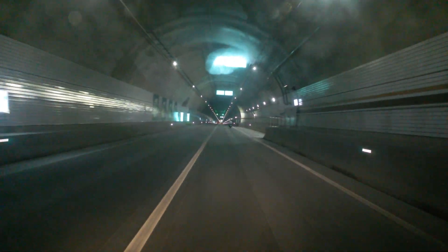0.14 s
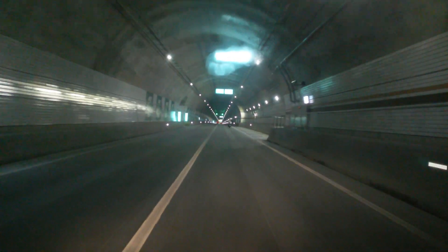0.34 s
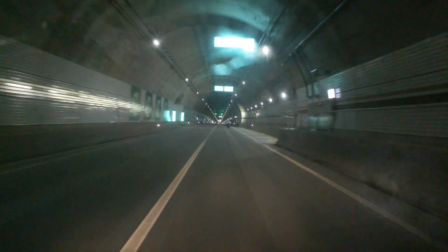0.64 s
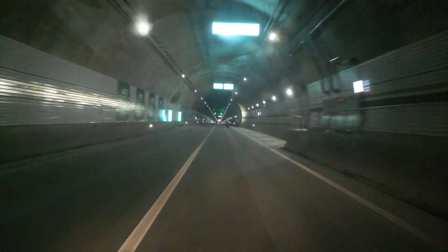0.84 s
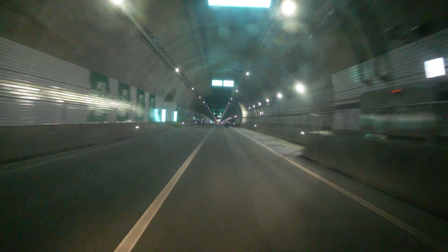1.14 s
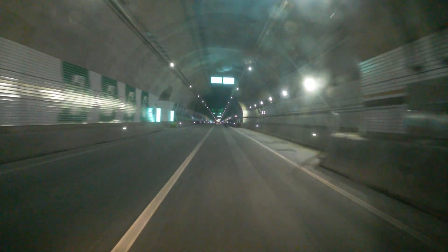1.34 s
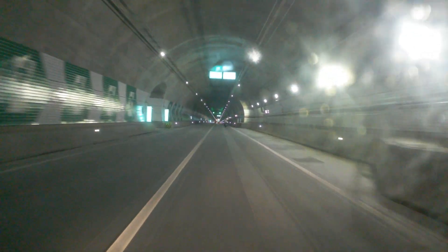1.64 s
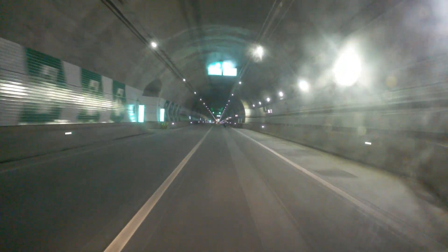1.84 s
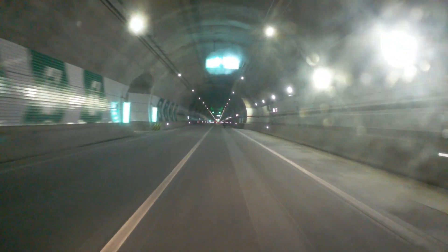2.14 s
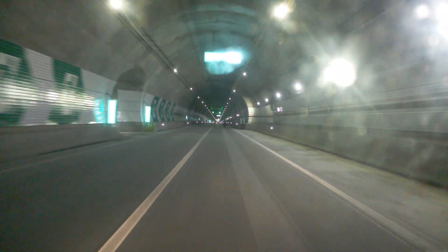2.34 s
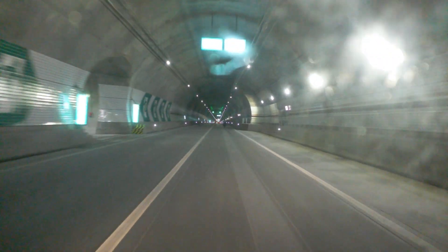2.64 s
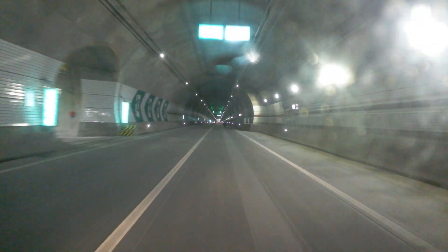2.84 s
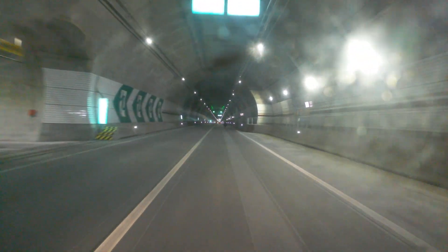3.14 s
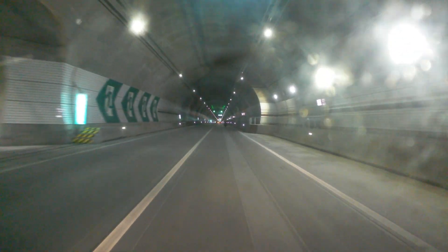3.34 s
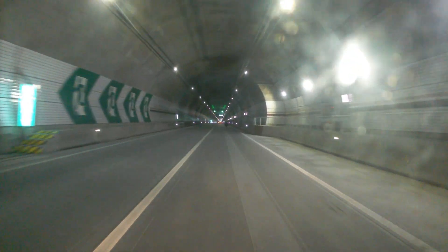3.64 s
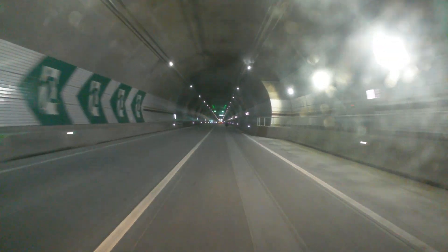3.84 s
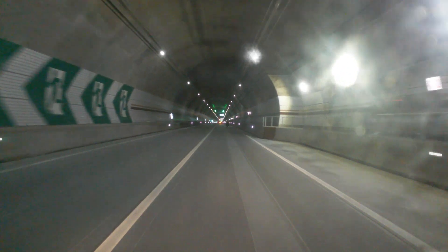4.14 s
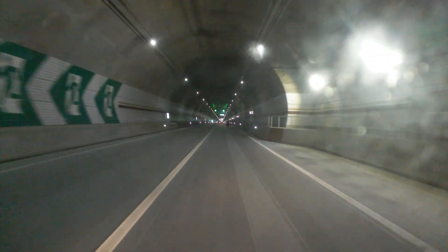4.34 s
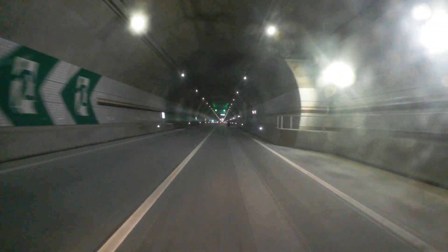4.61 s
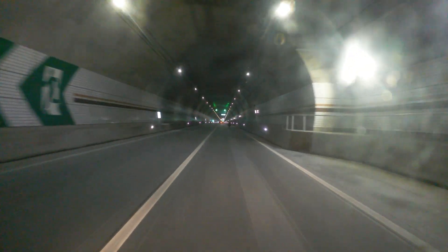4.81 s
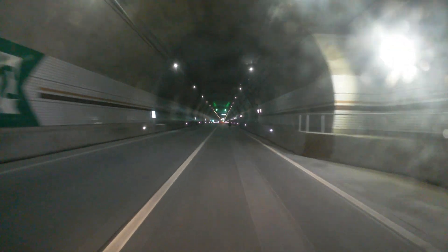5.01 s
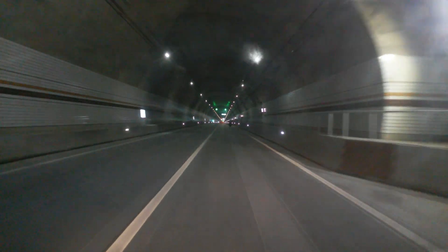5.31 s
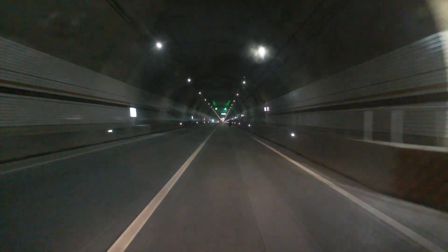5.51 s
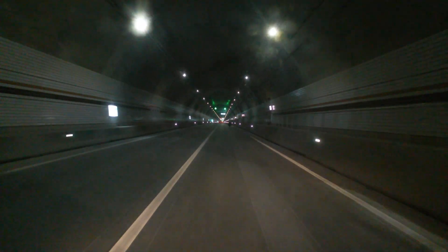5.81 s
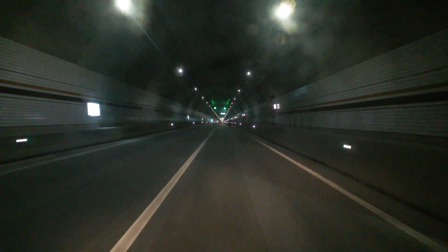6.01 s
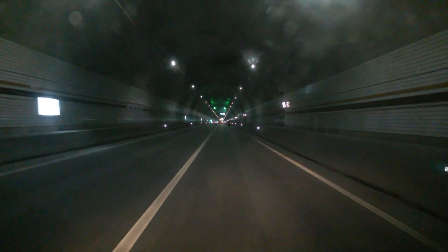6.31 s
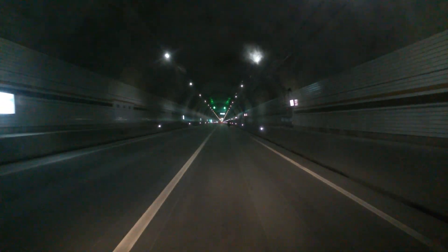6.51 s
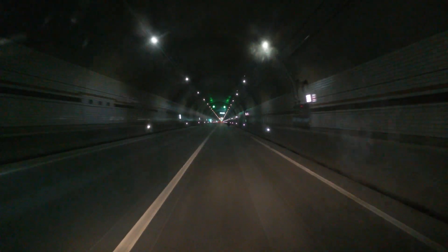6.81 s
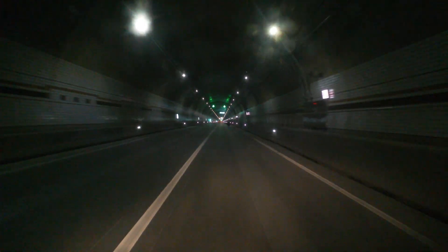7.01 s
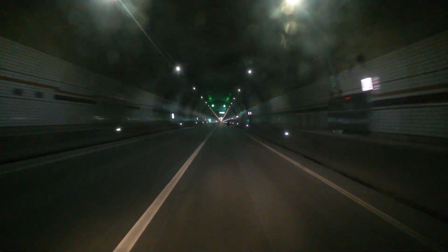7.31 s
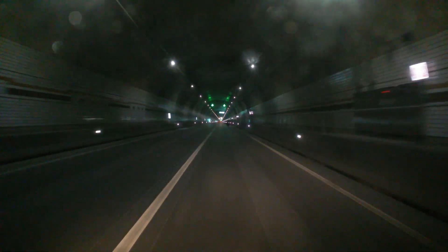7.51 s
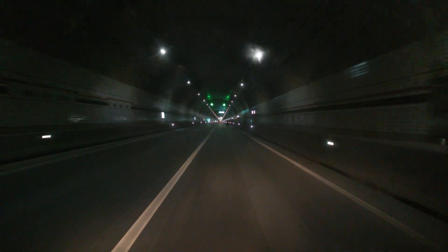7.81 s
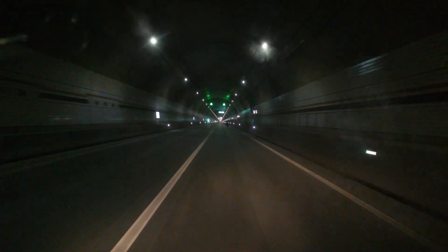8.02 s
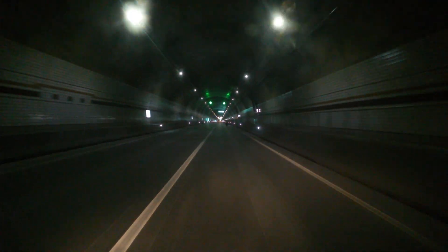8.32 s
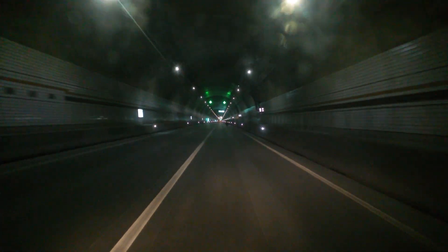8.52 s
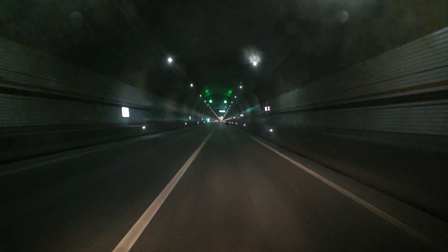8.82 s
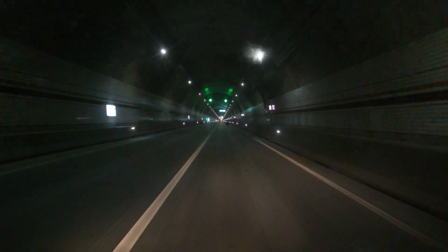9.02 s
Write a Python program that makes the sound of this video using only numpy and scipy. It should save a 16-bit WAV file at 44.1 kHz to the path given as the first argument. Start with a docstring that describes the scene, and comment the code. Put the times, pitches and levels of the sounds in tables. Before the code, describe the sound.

Steady low rumble and engine drone fill the cabin of a car driving through a tunnel, picked up by two dashboard microphones. Uneven spots give soft low thuds under a light hiss of air. After a few seconds the tyre tread drones louder and sings in brief pulses. Around the middle and again near the end, rougher road adds a booming roar and a gentle whoosh off the wall.

```python
"""Driving through a road tunnel

Inside a cruising car, heard by two microphones on the dashboard. The engine hums, the tyre tread
drones and sings in short surges, a faint whine fades, and air hisses at the glass with soft ticks.
The road rumbles through the car's body: coarser stretches swell the roar and uneven spots thud.
Now and then the wall throws tyre noise back as a whoosh."""
import sys
import numpy as np
from scipy import signal
from scipy.io import wavfile
from scipy.ndimage import uniform_filter1d

SR = 44100
rng = np.random.default_rng(int(sys.argv[2]) if len(sys.argv) > 2 else 0)


def to_wav(sig):
    """Store sig (one row per channel, or 1-D mono) as 16-bit WAV at the path in sys.argv[1].

    Samples outside -1..1 are clipped; the rate is SR.
    """
    pcm = np.clip(np.atleast_2d(sig), -1, 1) * 32767
    pcm = np.round(pcm).astype(np.int16)
    wavfile.write(sys.argv[1], SR, pcm.T)  # frames by channels


N = 403515
TIME_S = np.arange(N) / SR
MIDWAY_S = 4.0  # slow changes in loudness are counted from this moment


def gain_of(db):
    """Turn decibels into a number to multiply by."""
    return 10 ** (np.asarray(db) / 20)


def unit_level(x):
    """Scale a signal so that its average power is 1."""
    return x / np.sqrt(np.mean(x ** 2) + 1e-20)


def curve_at(points, hz):
    """Join a table's points into a curve and look it up at these pitches."""
    pitch_hz, value = np.transpose(points)
    return np.interp(np.log(hz + 1), np.log(pitch_hz + 1), value)


def drift(t, top_hz):
    """A random wander: sine waves with random starts, the slow ones stronger."""
    rates_hz = top_hz * np.geomspace(.05, 1, 16)
    return unit_level(sum(np.sin(2 * np.pi * (hz * t + rng.random())) / np.sqrt(hz) for hz in rates_hz))


def tone(turns, level_db, left_louder_db, left_ahead_rad):
    """A pure tone at both microphones; turns counts its vibrations so far."""
    side = np.array([[.5], [-.5]])
    gain = np.sqrt(2) * gain_of(level_db + left_louder_db * side)
    return gain * np.cos(2 * np.pi * turns + left_ahead_rad * side)


# How fast the four-stroke engine runs: time_s, cycles_per_s
ENGINE_SPEED = [(0, 16.55), (.7, 16.52), (3.9, 16.8), (5.9, 16.91), (9.15, 17.08)]
def engine_cycles():
    """Count the engine cycles completed since the start."""
    return np.cumsum(np.interp(TIME_S, *np.transpose(ENGINE_SPEED))) / SR


# The hum's tones: cycle_multiple, midway_level_db, midway_growth_db_per_s, left_louder_db, left_ahead_rad
HUM_TONES = [(2, -42, 0, 1.7, -0.16), (3, -49, 1.7, 2.2, -0.25), (4, -33, 2.0, 1.8, 0.1),
             (6, -45, 1.4, 1.5, -0.03), (7, -46, 1.1, 1.0, -0.26), (8, -26, -.1, -0.5, -0.05),
             (9, -38, .4, 1.6, -0.09), (10, -36, -.4, -0.9, -0.25), (11, -45, 2.0, 0.6, -0.4),
             (12, -29, 1.4, -0.6, -0.15), (13, -29.5, 1.0, -0.2, 0.12), (14, -25.7, -1.1, -1.6, -0.02),
             (15, -33, .1, 1.3, 0.15), (16, -50, -2.0, -1.9, -0.09), (17, -42, -.3, 1.7, -0.15),
             (19, -48, -1.5, -0.8, 0.15), (20, -47, 2.0, 1.5, -0.06), (25, -41, 3.3, -3.0, -1.0),
             (26, -48, 1.4, 0.7, 0.14), (28, -37.2, -.1, 2.6, -0.13), (32, -45, .6, 6.2, 0.92),
             (34.4, -47, .6, 2.0, 0.3), (36, -44, -.3, 1.0, -0.82), (40, -53, 0, 1.4, 0.85),
             (41, -55, 1.5, 1.2, 0.9), (56, -64, -1.3, 2.4, 2.92), (72, -59.5, -1.4, 1.8, -2.77),
             (96, -61, -1.3, 0, 1.0), (108, -67, -1.0, 0, 0), (144, -65, -.4, 1.0, 1.0)]
# Brief dips and swells of single tones: cycle_multiple, middle_s, half_length_s, change_db
HUM_DIPS_AND_SWELLS = [(14, 2.9, .65, -4), (15, .2, 0.44, -6), (15, 2.9, 1.0, -4), (28, 3.2, 0.79, -8),
                       (28, 5.2, 0.15, -3), (28, 6.7, .25, -6), (13, 1.9, 0.56, -4), (12, 1.6, 0.5, 4),
                       (12, 3.4, .12, 2), (12, 2.5, .3, 2), (12, 6.3, 0.078, 5), (12, 4.9, 0.058, 6),
                       (12, 7.7, 0.16, 5), (13, 8.74, 0.28, 1.5)]
def engine():
    """The engine hums at multiples of its cycle rate; each tone wavers a little with the load."""
    step = 8  # the hum is low, so every eighth sample is enough
    level_off_s, waver_db, slip_turns = 2.5, 1.0, .03
    cycles, t = engine_cycles()[::step], TIME_S[::step]
    grid_s = np.arange(0, N / SR + .1, .02)
    growing_s = level_off_s * np.tanh((grid_s - MIDWAY_S) / level_off_s)
    hum = np.zeros((2, len(t)))
    for multiple, midway_db, growth, left_louder_db, left_ahead_rad in HUM_TONES:
        level_db = midway_db + growth * growing_s + waver_db * drift(grid_s, top_hz=12)
        for which, middle_s, half_s, change_db in HUM_DIPS_AND_SWELLS:
            if which == multiple:
                level_db += change_db * np.exp(-((grid_s - middle_s) / half_s) ** 2)
        smear = .09 * multiple ** 2  # the body spreads each firing over the cycle
        slip = np.interp(t, grid_s, slip_turns * drift(grid_s, top_hz=3))
        turns = multiple * cycles + smear + slip
        hum += tone(turns, np.interp(t, grid_s, level_db), left_louder_db, left_ahead_rad)
    return signal.resample_poly(hum, step, 1, axis=1)[:, :N]


# How loud the tread drones: time_s, level_db
TREAD_LOUDNESS = [(0, -38), (2.3, -41.5), (2.6, -33), (3.2, -30), (3.8, -31.5), (4.2, -50), (4.45, -30.5),
                  (5.2, -33), (6.1, -38), (6.35, -30.5), (7.05, -31), (7.22, -38), (7.45, -27.5),
                  (7.95, -25), (8.3, -27.5), (8.7, -26.5), (9.15, -28)]
def tread_drone():
    """Tread blocks meet the road at a rate geared to the engine; pitch and loudness tremble."""
    blocks_per_cycle, tremble_hz, tremble_db = 24.36, 1.5, 2.2
    grid_s = np.arange(0, N / SR + .1, .01)
    pitch_shift_hz = np.interp(TIME_S, grid_s, tremble_hz * drift(grid_s, top_hz=12))
    turns = blocks_per_cycle * engine_cycles() + np.cumsum(pitch_shift_hz) / SR
    level_db = np.interp(TIME_S, *np.transpose(TREAD_LOUDNESS))
    level_db += np.interp(TIME_S, grid_s, tremble_db * drift(grid_s, top_hz=12))
    return tone(turns, level_db, left_louder_db=-4, left_ahead_rad=-1.4)


# The course of the whine: time_s, pitch_hz, level_db
WHINE_COURSE = [(0, 1191, -52), (2, 1191, -52), (3.7, 1188, -56), (5, 1180, -62), (9.15, 1172, -58)]
def whine(waver_hz=6.0):
    """A thin, fading tone with an unsteady pitch."""
    time_s, pitch_hz, level_db = np.transpose(WHINE_COURSE)
    grid_s = np.arange(0, N / SR + .1, .01)
    pitch_shift_hz = np.interp(TIME_S, grid_s, waver_hz * drift(grid_s, top_hz=15))
    turns = np.cumsum(np.interp(TIME_S, time_s, pitch_hz) + pitch_shift_hz) / SR
    return tone(turns, np.interp(TIME_S, time_s, level_db), left_louder_db=0, left_ahead_rad=.5)


# How alike noise is at the two microphones: pitch_hz, likeness_0_to_1
MIC_LIKENESS = [(30, 1), (60, 0.99), (95, 0.9), (140, 1), (200, 0.85), (300, 0.9), (400, 0.5), (480, 0.6),
                (580, 0.4), (640, 0.45), (690, 0.75), (760, 0.5), (850, 0.65), (1030, 0.6), (1550, 0.25),
                (2300, 0.1), (4000, 0)]
# How far the wave at the left microphone runs ahead: pitch_hz, left_ahead_rad
MIC_LEAD = [(20, 0.2), (200, 0.16), (430, -0.5), (690, 1.29), (1030, 3), (2070, 7)]
# How much louder the left microphone hears it: pitch_hz, left_louder_db
MIC_BALANCE = [(30, 3), (90, 3), (140, 4.5), (300, -1.5), (460, 1), (690, 3), (1030, 2), (1300, -0.5),
               (1550, -2.5), (2400, 2.5), (2700, -1.5), (3500, 1.5), (5400, 2), (6200, -3.5), (7200, -7),
               (8500, -1), (11000, 6.5)]
def cabin_noise(colour_db, frame_size, patchy_db, swell_db, swell_hz):
    """Gently changing noise at both microphones; colour_db gives its strength at each pitch."""
    hop = frame_size // 4
    frames, hz = N // hop + 5, np.fft.rfftfreq(frame_size, 1 / SR)
    a, b, c, d, patches = rng.standard_normal((frames, len(hz), 5)).T
    left, unrelated = a + 1j * b, c + 1j * d
    likeness = np.clip(curve_at(MIC_LIKENESS, hz), 0, 1)[:, None]
    delayed = left * np.exp(-1j * curve_at(MIC_LEAD, hz))[:, None]
    right = likeness * delayed + np.sqrt(1 - likeness ** 2) * unrelated
    balance = gain_of(curve_at(MIC_BALANCE, hz) / 2)[:, None]
    spectra = np.array([left * balance, right / balance])
    # blurring across pitch, then time, makes soft louder and quieter patches
    patches = uniform_filter1d(patches, size=10, axis=0)
    patches = unit_level(uniform_filter1d(patches, size=6, axis=1))
    swell = drift(np.arange(frames) * hop / SR, swell_hz)
    spectra *= gain_of(colour_db(hz)[:, None] + patchy_db * patches + swell_db * swell)
    _, noise = signal.istft(spectra, nperseg=frame_size, noverlap=frame_size - hop)
    return unit_level(noise[:, :N])


# The rumble's mix of low and high: pitch_hz, relative_level_db
RUMBLE_COLOUR = [(15, -20), (25, -6.5), (40, -6), (100, -6), (180, -0.5), (260, -4), (310, -8.5),
                 (450, -7.5), (520, -12.5), (630, -11), (800, -13.5), (860, -17.5), (900, -20), (1050, -22),
                 (1600, -28.5), (2200, -34), (4000, -62), (8000, -89)]
# Pitches that the car's body boosts or weakens: pitch_hz, width_hz, boost_db
BODY_RESONANCES = [(94.5, 16, 6.5), (166.3, 11, -4.5), (350, 68, 4.5), (406, 25, 3), (576, 16, -1.5),
                   (622, 26, -4.5), (664, 38, 1.5), (688, 37, 5), (770, 71, 3.5), (930, 27, 3.5),
                   (982, 21, 5), (1142, 57, 3.5), (1182, 30, 1.5), (1578, 36, 3.5)]
def road_rumble(midway_db=-21.5, rise_db_per_s=.06):
    """The road shakes the car's body, which rings more at some pitches than at others."""
    def colour_db(hz):
        boost_db = sum(db / (1 + (2 * (hz - pitch) / width) ** 2) for pitch, width, db in BODY_RESONANCES)
        return curve_at(RUMBLE_COLOUR, hz) + boost_db
    rumble = cabin_noise(colour_db, frame_size=4096, patchy_db=.6, swell_db=.3, swell_hz=2.6)
    return gain_of(midway_db + rise_db_per_s * (TIME_S - MIDWAY_S)) * rumble


def floor_boom(pitch_hz, width_hz=10, steady=3.0):
    """The floor panel booms: a steady ring with slow random swings on top."""
    pole = np.exp(-np.pi * width_hz / SR)
    noise = rng.standard_normal(N) + 1j * rng.standard_normal(N)
    swing = signal.lfilter([1], np.poly([pole, pole]), noise)  # keeps only slow changes
    strength = steady + unit_level(swing.real) + 1j * unit_level(swing.imag)
    ring = np.exp(2j * np.pi * np.cumsum(pitch_hz) / SR)
    return unit_level((strength * ring).real)


# The roar's mix of low and high: pitch_hz, relative_level_db
ROAR_COLOUR = [(50, -22), (80, -9.5), (100, -2), (125, -11), (150, -2.5), (200, 3.5), (400, -9.5),
               (650, -9.5), (780, -9.5), (1000, -18.5), (1150, -14.5), (1400, -27.5), (1700, -32),
               (2200, -47), (5000, -91)]
# Coarser stretches of road: middle_s, half_length_s, roar_db, boom_db, boom_pitch_hz
COARSE_STRETCHES = [(5.153, 0.46, -28, -25, 166.8), (7.746, 0.19, -25, -27.5, 175.8),
                    (8.848, 0.86, -35.5, -27, 178.2)]
def road_roar(smooth_roar_db=-43.5, smooth_boom_db=-48.5):
    """The tyres roar and the floor booms, softly on smooth road and louder on coarse stretches."""
    middle_s, half_s, roar_db, boom_db, boom_hz = np.transpose(COARSE_STRETCHES)[:, :, None]
    passing = np.exp(-((TIME_S - middle_s) / half_s) ** 2)
    roar_gain = gain_of(smooth_roar_db) + (gain_of(roar_db) * passing).sum(0)
    boom_gain = gain_of(smooth_boom_db) + (gain_of(boom_db) * passing).sum(0)
    roar = cabin_noise(lambda hz: curve_at(ROAR_COLOUR, hz),
                       frame_size=4096, patchy_db=2, swell_db=.7, swell_hz=3)
    boom = floor_boom(np.interp(TIME_S, middle_s[:, 0], boom_hz[:, 0]))
    return roar_gain * roar + boom_gain * boom


# The hiss's mix of low and high: pitch_hz, relative_level_db
HISS_COLOUR = [(880, -40.5), (1500, -9.5), (1590, -4.5), (1860, -10.5), (2020, -3.5), (2240, -7),
               (2460, -1), (3040, -7.5), (3520, -8.5), (4860, -10.5), (5440, -7), (7120, -11.5),
               (9080, -18.5), (11300, -32), (12000, -45), (15600, -73), (22000, -120)]
def air_hiss(level_db=-42):
    """Air rushes over the glass and hisses, flickering slightly."""
    return gain_of(level_db) * cabin_noise(lambda hz: curve_at(HISS_COLOUR, hz),
                                           frame_size=1024, patchy_db=.78, swell_db=.18, swell_hz=40)


# Uneven spots in the road: start_s, peak_db
UNEVEN_SPOTS = [(.08, -24), (2.12, -22), (3.37, -23), (7.74, -28), (8.55, -27)]
def thuds(pitch_hz=97, rise_s=.045):
    """The wheels cross an uneven spot and the body rings low: a soft rise and a short fall."""
    start_s, peak_db = np.transpose(UNEVEN_SPOTS)[:, :, None]
    age = np.maximum(TIME_S - start_s, 0) / rise_s
    loudness = (gain_of(peak_db) * age * np.exp(1 - age)).sum(0)
    return loudness * np.sin(2 * np.pi * pitch_hz * TIME_S)


# The clearer ticks: start_s, peak_db
CLEAR_TICKS = [(0.9194, -47), (2.3794, -47), (2.9243, -45), (3.8094, -47), (3.9594, -45), (4.0088, -46),
               (4.5594, -49), (5.0194, -47), (7.0594, -47), (7.2194, -47), (7.7594, -47)]
def ticks(small_per_s=10, small_db=-51, left_louder_db=1.5, rise_s=.0055):
    """Tiny puffs of high noise nearer the left microphone: clear ones at set times, small ones at random."""
    small = gain_of(small_db + 2 * rng.standard_normal(N))
    small *= rng.random(N) < small_per_s / SR
    strikes = np.array([small, .3 * small])
    for start_s, peak_db in CLEAR_TICKS:
        strikes[:, round(start_s * SR)] += gain_of(peak_db + np.array([.5, -.5]) * left_louder_db)
    age = np.arange(2000) / SR / rise_s
    puffs = signal.oaconvolve(strikes, (age * np.exp(1 - age))[None])[:, :N]
    treble_band = signal.butter(4, [4100, 7900], "bandpass", fs=SR, output="sos")
    return puffs * unit_level(signal.sosfilt(treble_band, rng.standard_normal((2, N))))


# Changes in the tunnel wall going by: peak_s, peak_db, rise_s
WALL_CHANGES = [(.9, -44.5, .06), (3.75, -47, .1), (4.78, -40, 0.17), (7.72, -35.5, 0.19)]
# The whoosh's mix of low and high: pitch_hz, relative_level_db
WHOOSH_COLOUR = [(100, -60), (700, -12), (950, -4), (1200, 2), (1500, -7), (1900, -18), (5000, -80)]
def wall_whooshes(fade_over_rise=1.6):
    """Tyre noise thrown back by the wall swells, then fades more slowly."""
    swell = np.zeros(N)
    for peak_s, peak_db, rise_s in WALL_CHANGES:
        width_s = rise_s * np.where(TIME_S > peak_s, fade_over_rise, 1)
        swell += gain_of(peak_db) * np.exp(-((TIME_S - peak_s) / width_s) ** 2)
    return swell * cabin_noise(lambda hz: curve_at(WHOOSH_COLOUR, hz),
                               frame_size=1024, patchy_db=.5, swell_db=.5, swell_hz=4.6)


# Short surges of tyre singing: middle_s, peak_db, pitch_hz
SINGING_SURGES = [(2.7, -34, 697), (2.9, -45, 685), (3.1, -32.5, 668), (3.3, -36, 663), (3.54, -37, 672),
                  (3.77, -30.5, 663), (3.99, -30, 674), (4.2, -39, 660), (4.41, -35, 675), (4.59, -35, 666),
                  (5.02, -30, 667), (5.35, -37, 685), (5.63, -31, 670), (5.9, -37, 668), (6.1, -40, 670),
                  (6.37, -32, 665), (6.8, -33, 677), (7.74, -35.5, 773), (7.9, -31, 681),
                  (7.95, -31.5, 784), (8.02, -32, 704)]
def tyre_singing(half_length_s=.046, wobble_hz=8.7):
    """The tyre sings in surges, each a soft-edged tone with an unsteady pitch."""
    singing = np.zeros((2, N))
    t = np.arange(-3 * half_length_s, 3 * half_length_s, 1 / SR)
    swell = np.exp(-(t / half_length_s) ** 2)
    for middle_s, peak_db, pitch_hz in SINGING_SURGES:
        turns = np.cumsum(pitch_hz + wobble_hz * drift(t, top_hz=18.3)) / SR
        note = tone(turns, peak_db, left_louder_db=4.5, left_ahead_rad=1.04)
        start = round((middle_s + t[0]) * SR)
        singing[:, start:start + len(t)] += swell * note
    return singing


def scene():
    """Add up all the sounds inside the car."""
    constant = engine() + tread_drone() + whine() + road_rumble() + road_roar() + air_hiss()
    return constant + thuds() + ticks() + wall_whooshes() + tyre_singing()


def record(dry, cutoff_hz=12000):
    """The recorder cuts off the very highest pitches."""
    low_pass = signal.firwin(511, cutoff_hz, window=("kaiser", 9), fs=SR)
    return signal.oaconvolve(dry, low_pass[None], "same")


dry = scene()
out = record(dry)
to_wav(out)
```